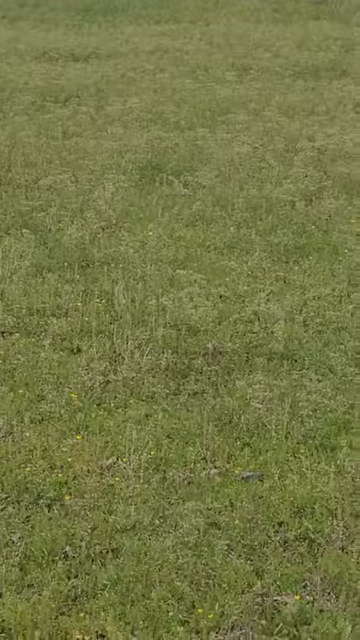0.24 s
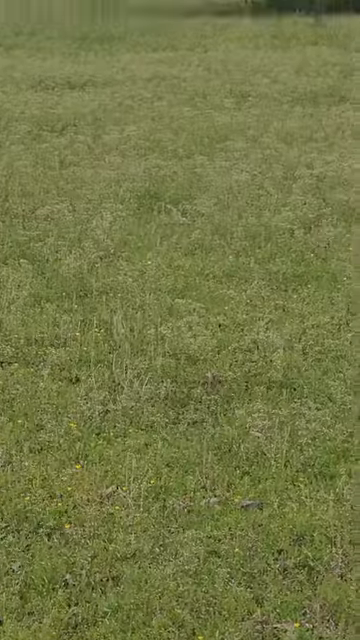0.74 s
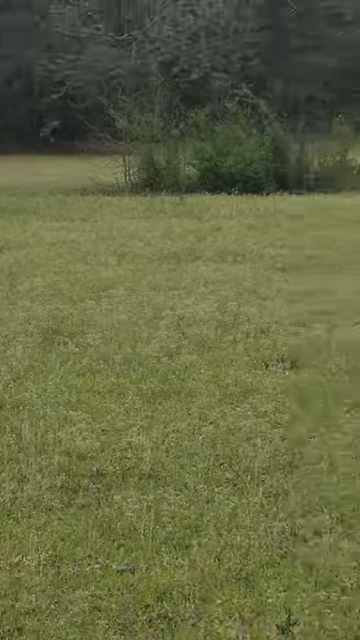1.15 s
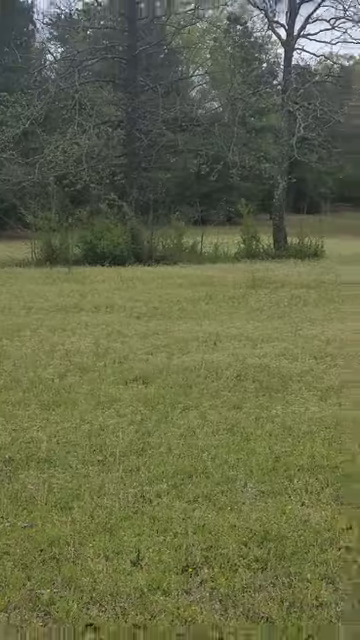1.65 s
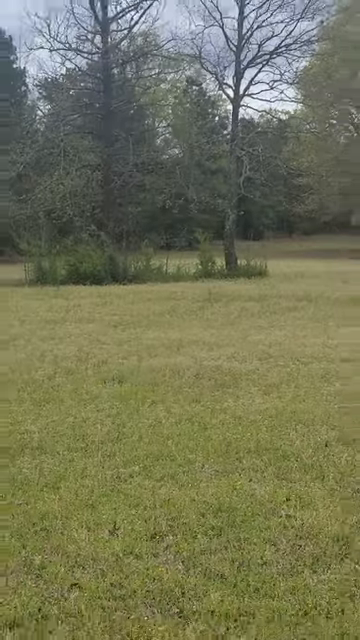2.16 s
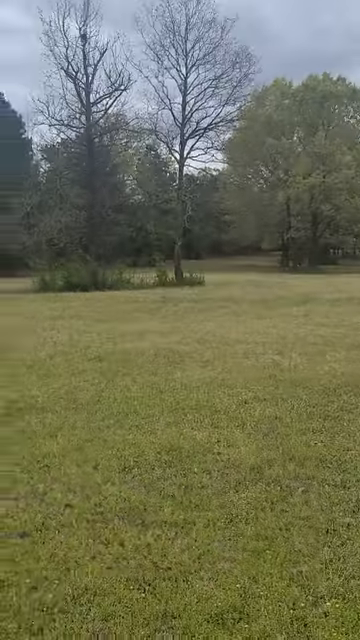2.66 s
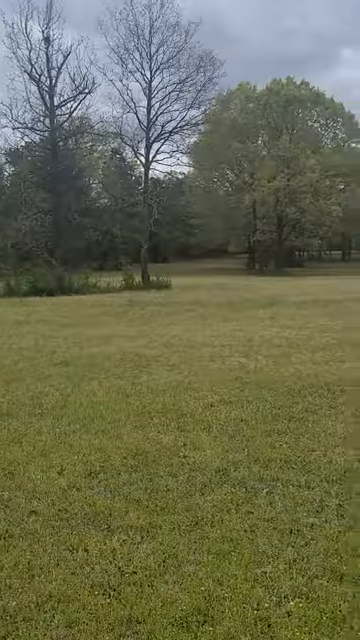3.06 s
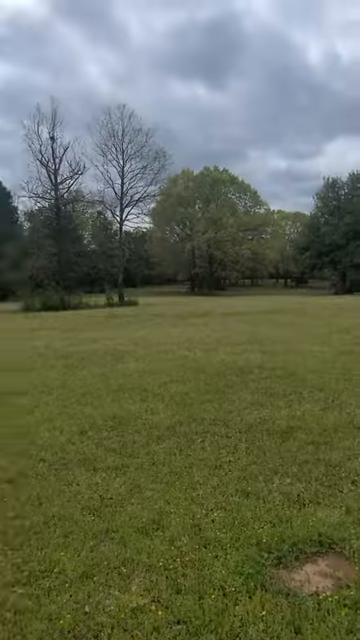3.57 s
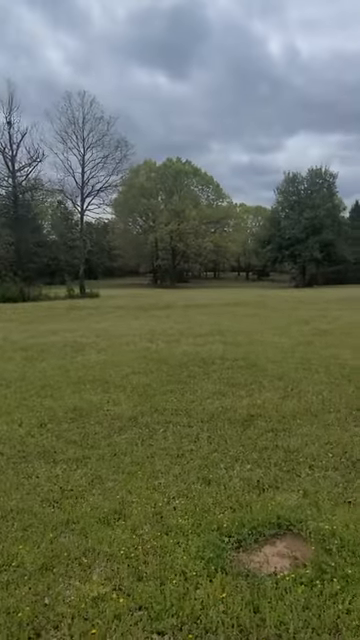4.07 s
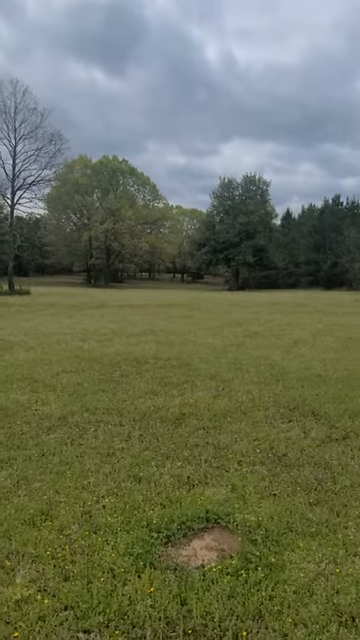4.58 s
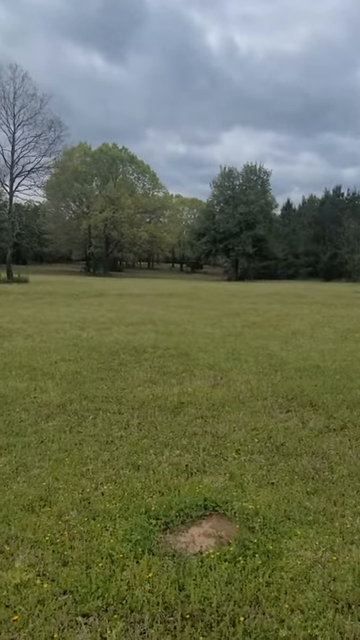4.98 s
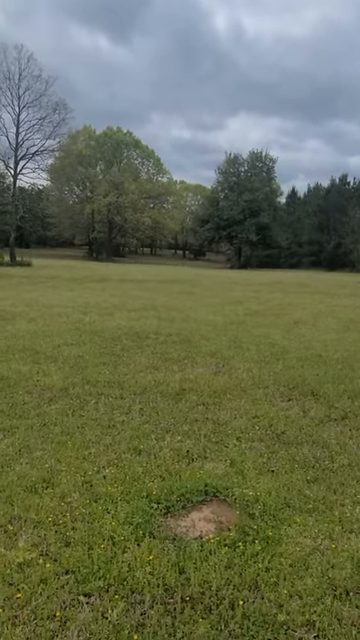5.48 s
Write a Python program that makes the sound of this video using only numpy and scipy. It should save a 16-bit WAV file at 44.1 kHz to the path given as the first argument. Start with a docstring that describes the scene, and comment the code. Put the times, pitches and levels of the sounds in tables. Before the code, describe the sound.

Outdoors in an open grassy field, a hand-held phone is buffeted by low wind, strongest at the start and again near the middle. A crow caws once early while a thin, high katydid buzz fades and then stops. Faint birds whistle far off. In the second half a bird gives quick dry rattles and short clucks, echoed softly by trees, over faint grass hiss.

```python
"""Gusts buffet the two ports of a hand-held phone in an open field: low noise shaped by passing eddies.
A katydid's wing-stroke tones fade and stop; a crow caws once, as harmonics weighted by its throat.
A bird rattles and clucks in gliding notes with octaves; far birds whistle and call high and thin over
faint tonal grains. Small-insect ticks and other short ticks are decaying noise; a finger slides once.
Filtered noise makes a far drone, rustling trees and the hiss of grass."""
import sys
import numpy as np
from scipy import signal
from scipy.fft import rfft, irfft, next_fast_len
from scipy.io import wavfile
from scipy.ndimage import uniform_filter1d, map_coordinates

SR = 44100
rng = np.random.default_rng(int(sys.argv[2]) if len(sys.argv) > 2 else 0)


def transcribe(u):
    """Save the signal u as a 16-bit wav file named by the first command-line argument.

    u: samples, shape (n,) or (channels, n), limited to [-1, 1]; the rate is SR.
    q: integer samples, one column per channel.
    """
    v = np.clip(np.atleast_2d(u).T, -1, 1)
    q = np.round(v * 32767).astype(np.int16)
    wavfile.write(sys.argv[1], SR, q)


N = 252680

# Spectrum of the far drone: frequency_hz, relative_db (per Hz)
DRONE_SPECTRUM = [(30, -21), (70, -8.5), (125, 2.5), (165, -4), (230, -16), (330, -31.5), (600, -59)]
# Spectrum of wind in the trees: frequency_hz, relative_db (per Hz)
TREE_SPECTRUM = [(150, -44), (300, -1.5), (450, -7), (650, -4), (850, -9.5), (1150, -11), (1400, -19),
                 (2000, -58)]
# Likeness of the trees at the two ports: frequency_hz, correlation (no unit)
TREE_LIKENESS = [(300, 0.57), (1200, 0.23)]
# Course of drone and trees, before their random swells: time_s, drone_db, trees_db
FAR_LEVELS = [(.5, -47.5, -64), (1.2, -49.5, -66.5), (2, -50, -70), (3, -52.5, -74), (4.4, -52.5, -73.5),
              (5.2, -52.5, -74.5), (5.73, -58.5, -74.5)]
# Spectrum of grass and far insects: frequency_hz, relative_db (per Hz)
HISS_SPECTRUM = [(600, -38), (1300, 1), (1800, 0), (2400, 3), (3000, 1.5), (3700, 2), (5100, -3.5),
                 (5400, -0.5), (5800, -4), (7300, -9), (8400, -21), (9400, -9), (10600, -31), (12200, -8),
                 (15800, -27.5)]
# Course of the hiss, before its left-right offset: time_s, level_db
HISS_LEVELS = [(.3, -70), (.9, -72), (1.5, -73.5), (2.2, -77.5), (3.2, -81), (4.3, -77.5), (4.8, -80.5),
               (5.4, -78), (5.73, -78)]

# Whistles of far birds, before flutter: start_s, length_s, start_hz, end_hz, level_db
WHISTLES = [(0.55, 0.06, 2487, 2390, -71), (.6, .02, 2220, 2080, -70), (.63, .016, 2420, 2420, -71),
            (.662, .022, 2260, 2190, -72), (0.797, 0.034, 2440, 2374, -66), (.797, .05, 2800, 2850, -71),
            (.84, 0.02, 2200, 2204, -64), (0.905, 0.014, 2230, 2270, -62.5), (1.635, .035, 2620, 2740, -68),
            (1.705, .03, 2720, 2660, -68), (1.98, 0.029, 2360, 2510, -72),
            (3.453, 0.055, 2530, 2440, -76.5), (1.755, 0.082, 2258, 2186, -62),
            (2.023, 0.045, 2780, 2830, -69), (2.065, .06, 2860, 2900, -74), (2.106, 0.081, 2170, 2084, -67),
            (4.174, 0.034, 2450, 2470, -69.5), (4.38, 0.03, 2450, 2460, -71), (5.49, .02, 4450, 4750, -76),
            (5.535, .05, 3300, 3600, -78), (5.583, .03, 3750, 4900, -78), (5.65, .042, 3300, 3700, -78),
            (5.69, .03, 3900, 5100, -78)]
# Notes of a high hoarse bird, before roughening: start_s, length_s, start_hz, end_hz, level_db
SEEP_NOTES = [(2.15, .05, 8600, 7750, -87), (2.195, .095, 7180, 7280, -74), (2.27, .16, 7250, 7350, -83),
              (2.19, .18, 7900, 7600, -86)]

# Short ticks before their colour, the first five a small insect's, the others perhaps the grip's:
# start_s, level_db, centre_hz, sharpness_q (no unit), t60_s
SHORT_TICKS = [(.067, -52, 6500, 1, .006), (.084, -51, 7800, 2, .005), (.102, -47, 7500, .8, .005),
               (.121, -48, 6000, .8, .008), (.139, -48, 8000, .6, .005), (.281, -55, 7800, 2, .006),
               (0.3238, -45, 3500, .8, 0.0024), (.3338, -30, 4500, .7, 0.002),
               (1.7985, -48, 6800, 1.8, 0.009), (1.9021, -51, 4050, 3, 0.0065),
               (2.8582, -40, 3200, 1.2, 0.002), (2.859, -54, 1200, 3, .03), (2.88, -57, 4500, .6, 0.008),
               (2.881, -53, 1200, 3, .03), (2.886, -62, 6300, 1, .02), (4.1404, -57, 9000, .8, .003)]
# Colour of the short ticks: frequency_hz, gain_db
TICK_COLOUR = [(300, 11.5), (7500, 0), (10000, -11), (15000, -10.5)]
# Course of a sliding finger: time_s, level_db
SLIDE_LEVELS = [(1.61, -100), (1.625, -69), (1.665, -67), (1.685, -80), (1.71, -100)]
# Spectrum of the slide: frequency_hz, relative_db (per Hz)
SLIDE_SPECTRUM = [(700, -30), (1300, -12), (2500, -10), (3100, -17), (5000, -46), (8000, -100)]

# Course of the small insect's run of clicks, before click scatter and colour: time_s, level_db
TICKER_LEVELS = [(4.7, -100), (4.75, -91), (4.85, -73), (4.97, -66), (5.1, -66.5), (5.17, -69), (5.25, -66),
                 (5.28, -97)]
# Colour of its clicks: frequency_hz, gain_db
TICKER_COLOUR = [(5000, -30), (7200, 0), (8200, -7), (9300, 0), (11000, -3), (12000, -30)]

# Rattle notes, before scatter, glide and syrinx: start_s, pitch_hz, level_db, octave_db
RATTLE_NOTES = [(3.589, 1170.0, -70, -80), (3.613, 1190.0, -68, -79), (3.643, 1200.0, -63, -76),
                (3.669, 1230.0, -63, -75), (3.697, 1240.0, -64, -75), (3.723, 1180.0, -61, -73),
                (3.756, 1290.0, -58, -66), (3.784, 1260.0, -59, -69), (3.811, 1200.0, -59, -70),
                (3.839, 1230.0, -61, -72), (3.869, 1190.0, -58, -67), (3.895, 1190.0, -64, -74),
                (3.927, 1190.0, -58, -69), (3.954, 1190.0, -60, -70), (3.989, 1160.0, -62, -63),
                (4.022, 1180.0, -55, -61), (4.41, 1270.0, -46, -54), (4.464, 1250.0, -50, -59),
                (4.514, 1220.0, -52, -53), (4.537, 1290.0, -55, -56), (4.564, 1260.0, -54, -54),
                (4.59, 1270.0, -53, -54), (4.618, 1250.0, -53, -54), (4.643, 1260.0, -56, -55),
                (4.67, 1230.0, -54, -55), (4.698, 1260.0, -57, -56), (4.725, 1240.0, -52, -56),
                (4.753, 1230.0, -55, -55), (4.784, 1160.0, -63, -56), (5.042, 1260.0, -57, -57),
                (5.072, 1220.0, -55, -54), (5.093, 1220.0, -62, -60), (5.124, 1190.0, -55, -53),
                (5.15, 1270.0, -57, -57), (5.178, 1200.0, -60, -57), (5.209, 1170.0, -70, -60)]
# Clucks, before pitch waver and syrinx: start_s, length_s, top_share (of the length),
# start_hz, top_hz, end_hz, level_db, octave_db
CLUCK_NOTES = [(4.914, 0.041, .25, 1016, 1050, 880, -53.5, -59.5),
               (4.945, .024, 0.41, 897, 1198, 1020, -50.5, -53), (5.207, .018, .5, 880, 930, 880, -78, -68),
               (5.363, 0.0398, .6, 1027, 1190, 896, -53, -54)]
# Resonances of the rattling bird's syrinx: frequency_hz, gain_db
SYRINX = [(800, -20), (1200, -1), (1600, 6.5), (2200, 5), (2480, 0), (2750, 10), (3000, -10), (3400, -32)]
# Tilt of its voice before the trees answer: frequency_hz, gain_db
ANSWER_TILT = [(1200, 2.4), (2400, 6.5)]
# Answers of two tree lines, before flutter: delay_s, level_db
TREE_LINE_SLAPS = [(.05, -25), (.108, -27)]
NOTE_SCATTER_DB, NOTE_SCATTER = 1.2, .015  # spread of level (dB) and of pitch (share of the pitch)

# Course of the caw: time_s, pitch_hz (before jitter), effort_db, beak_opening (factor on throat resonances)
CAW_COURSE = [(.243, 335, -70, .95), (.255, 350, -52, 0.93), (.282, 364, -45.5, 0.99),
              (.34, 356.6, -46.5, 1.066), (.426, 329.4, -47.5, 0.98), (.472, 319, -49.5, 1.03),
              (.487, 309.5, -51, 1.07), (.502, 284.4, -54, 1.03), (.52, 272, -62, 1.03),
              (.54, 266, -85, 1.2)]
# Resonance of the crow's throat: frequency_hz, gain_db
THROAT = [(1150, -40), (1290, -24), (1450, -13), (1620, -1), (1800, 0), (1980, -8), (2150, -10),
          (2220, -16), (2330, -24), (2450, -30), (2700, -50)]
RASP_HZ, RASP_SPAN_HZ = 315, 90  # roughness starts below this pitch and would be full this far below

# Course of the katydid, before the wing resonance: time_s, level_db, left_right_db
KATYDID_COURSE = [(0, -61.5, -12), (.5, -65.5, -14), (1.0, -70, -20), (2.0, -71.5, -17.5),
                  (2.7, -77.5, -21.5), (3.1, -80, -16), (3.58, -81, -14.5)]
# One wing stroke, before scatter: cycle_share (no unit), level_db, pitch_hz
WING_STROKE = [(.23, -30, 9380), (.28, -4, 9420), (.4, -1, 9610), (.53, 0, 9700), (.62, 0, 9670),
               (.69, -1, 9460), (.73, -30, 9300)]
# Resonance of the wing: frequency_hz, gain_db
WING_RESONANCE = [(8400, -14), (9000, 1), (9250, 3.5), (9450, -0.5), (9800, -0.5), (10000, -10),
                  (10600, -22)]
STROKE_SCATTER_HZ = 22  # spread of pitch from stroke to stroke
SLIP_HZ, SLIP_OVER = 140, 1.5  # a stroke whose timing draw passes this many sigma falls flat by SLIP_HZ

# Spectrum of the buffeting: frequency_hz, relative_db (per Hz)
BUFFET_SPECTRUM = [(12, -18.5), (25, -4.5), (42, -0.5), (65, -3), (100, -12), (160, -23.5), (250, -41.5),
                   (420, -57.5), (900, -92), (2000, -120)]
# Steady buffeting, before sharing between the ports: time_s, level_db, left_right_db
BREEZE = [(0, -47, 0), (.8, -52, -1), (1.3, -52.5, 3.5), (2.1, -52, 0.5), (2.6, -46, 10), (3.3, -56, 8),
          (3.8, -62.5, -1), (4.4, -54, 4), (5.1, -56, 0), (5.73, -59.5, 2)]
# Eddies that break on the ports, before sharing: centre_s, half_width_s, level_db, left_right_db
GUSTS = [(0.121, 0.051, -31, -16.5), (0.213, 0.041, -23, -15.5), (.31, 0.061, -24.5, -23),
         (.4, 0.027, -33, -11), (0.537, 0.028, -34, -13), (.64, 0.029, -34.5, -22), (.94, 0.045, -45, 0),
         (1.08, 0.026, -43.5, 4), (1.26, 0.037, -46.5, 19), (1.538, 0.046, -31, 7.5),
         (1.68, 0.038, -22, -8.5), (1.769, .045, -25.5, 5), (1.86, 0.027, -36.5, 8), (2.31, 0.036, -44, 12),
         (2.47, 0.028, -39.5, 17), (2.711, 0.044, -39, 14), (2.81, 0.024, -36.5, 4.5),
         (2.99, 0.042, -43.5, 11), (3.55, 0.026, -47, 4), (4.1, 0.017, -42.5, 4), (4.28, 0.025, -46, 9),
         (4.85, 0.024, -42, 10), (4.96, 0.012, -34.5, 10)]
# Puffs on a port, before their envelope: start_s, level_db, left_right_db, starting_hz (then falling)
PUFFS = [(0.268, -27, -19, 239), (0.332, -29, -21, 257), (1.657, -42, -16, 246), (4.592, -43, -5, 330),
         (4.604, -38, -5, 380), (4.616, -40, -5, 480), (4.951, -39, 21, 242)]

TOP_HZ = 15838  # band limit of the phone


def amp(db):
    """Decibels are logarithmic: 20 dB is a tenfold amplitude."""
    return 10 ** (np.asarray(db) / 20)


def unit(x):
    """Root-mean-square normalization: scales x to rms 1."""
    return x / np.sqrt(np.mean(x ** 2) + 1e-20)


def along(points, hz):
    """Interpolation over log frequency of (Hz, value) points."""
    f, v = np.transpose(points)
    return np.interp(np.log(hz + 1), np.log(f + 1), v)


def curves(rows):
    """Linear interpolation in time: one value per sample for each column after the time."""
    s, *cols = np.transpose(rows)
    return [np.interp(np.arange(N) / SR, s, c) for c in cols]


def wobble(rate):
    """Band-limited fluctuation: a smooth random curve with rate knots a second."""
    knots = rng.standard_normal(int(N * rate / SR) + 4)
    return map_coordinates(knots, [np.arange(N) * rate / SR])


def filtered(x, response):
    """Linear filtering: the spectrum of x times a response of frequency."""
    m = next_fast_len(N + SR // 2)
    return irfft(rfft(x, m) * response(np.fft.rfftfreq(m, 1 / SR)), m)[..., :N]


def rush(spectrum, alike, patchy_db):
    """Turbulent noise: partly coherent stereo noise of rms 1, patchy in time and frequency."""
    z = signal.stft(rng.standard_normal((2, N + 512)), nperseg=512)[2]
    field = uniform_filter1d(rng.standard_normal(z.shape[1:]), size=5, axis=0)
    field = uniform_filter1d(field, size=10, axis=1)
    pair = signal.istft(z * amp(patchy_db * unit(field)), nperseg=512)[1][:, :N]

    def mid_side(hz):
        # mixing two independent noises at this angle gives the wanted correlation
        turn = np.arccos(np.clip(along(alike, hz), -1, 1)) / 2
        return amp(along(spectrum, hz)) * [np.cos(turn), np.sin(turn)]

    mid, side = filtered(pair, mid_side)
    return unit(np.array([mid + side, mid - side]))


def placed(x, pan_db, count):
    """Interaural cues: a left-right level difference, and the left port count samples late."""
    return np.array([np.roll(x, count) * amp(pan_db / 2), x * amp(-pan_db / 2)])


def echoes(x, t60, db):
    """Diffuse scattering by the tree line: a decaying noise tail, different at each port."""
    t = np.arange(SR // 2) / SR
    tail = rng.standard_normal((2, len(t))) * amp(-60 * t / t60) * (1 - np.exp(-t / 0.0016))
    tail = tail / np.linalg.norm(tail[0])
    return amp(db) * signal.fftconvolve(x[None], tail, axes=1)[:, :N]


def add(track, s, sound):
    """Superposition: mixes a sound in at s seconds."""
    part = track[..., round(s * SR):][..., :sound.shape[-1]]
    part += sound[..., :part.shape[-1]]


def note(length, pitch_hz, db, octave_db, edge, lean=1):
    """A gliding tone with its second harmonic; edge under 1 flattens the top, lean under 1 hastens the attack."""
    u = np.linspace(0, 1, round(length * SR))
    pitch = np.interp(u, np.linspace(0, 1, len(pitch_hz)), pitch_hz)
    phase = 2 * np.pi * np.cumsum(pitch) / SR
    envelope = np.abs(np.sin(np.pi * u ** lean)) ** edge
    return envelope * (amp(db) * np.sin(phase) + amp(octave_db) * np.sin(2 * phase))


def distance():
    """Spatial coherence: a far drone nearly alike at both ports, less alike trees, diffuse hiss of grass."""
    drone_db, trees_db = curves(FAR_LEVELS)
    drone = amp(drone_db + 1.1 * wobble(2.67)) * rush(DRONE_SPECTRUM, [(100, 0.88)], patchy_db=2.5)
    drone = drone * amp([[-.7], [.7]])
    trees = amp(trees_db + 0.31 * wobble(5.27)) * rush(TREE_SPECTRUM, TREE_LIKENESS, patchy_db=2.0)
    hiss_db = curves(HISS_LEVELS)[0] + np.array([[-1.6], [1.6]])
    hiss = amp(hiss_db) * rush(HISS_SPECTRUM, [(2000, .08)], patchy_db=1.6)
    return drone + trees + hiss


def tonal_grains():
    """Random superposition: a faint random texture of 40 short tonal grains, about 2 to 3 kHz."""
    out = np.zeros(N)
    for when, pitch, glide, size in rng.random((40, 4)):
        hz = 2050 + 900 * pitch
        pitches = [hz, hz * (1 + .1 * (glide - .5))]
        add(out, when * N / SR, note(.03, pitches, -79 + 8 * size, octave_db=-120, edge=.8))
    return amp(-7) * (placed(out, -4, count=-5) + echoes(out, t60=.3, db=-2))


def whistles():
    """Amplitude modulation: nearly pure gliding tones of far birds flutter on their way."""
    far = np.zeros(N)
    for s, length, *pitch_hz, db in WHISTLES:
        add(far, s, note(length, pitch_hz, db, octave_db=-120, edge=.45))
    return far * amp(2 * wobble(70))  # moving air makes them flutter


def seeps():
    """Random modulation broadens a thin high tone into a hoarse call, blurred by the trees."""
    out = np.zeros(N)
    for s, length, *pitch_hz, db in SEEP_NOTES:
        add(out, s, note(length, pitch_hz, db, octave_db=-120, edge=.5))
    out = out * (.8 + .8 * wobble(260))
    return placed(out, -8, count=-5) + echoes(out, t60=.4, db=-1)


def short_ticks_and_slide():
    """Resonance and friction: short ticks are decaying noise through a resonator; a finger's slide is noise."""
    out, t = np.zeros((2, N)), np.arange(SR // 30) / SR
    for s, db, hz, q, t60 in SHORT_TICKS:
        decay = amp(-60 * t / t60) + 0.09 * amp(-60 * t / 0.05)  # the faint second part has its own t60
        burst = rng.standard_normal((2, len(t))) * decay
        b, a = signal.iirpeak(min(hz, SR / 3), q, SR)
        add(out, s, amp(db) * signal.lfilter(b, a, burst))
    out = filtered(out, lambda hz: amp(along(TICK_COLOUR, hz)))
    slide = rush(SLIDE_SPECTRUM, [(1000, 0.58)], patchy_db=-2.5)
    return out + amp(curves(SLIDE_LEVELS)[0]) * slide


def ticker():
    """Impulse excitation: a small insect's uneven clicks, about fifty a second, each ring one noise body."""
    gaps_s = 0.02 * (1 + 0.17 * rng.standard_normal(N // 500))
    at = (SR * np.cumsum(gaps_s)).astype(int)
    at = at[at < N]
    sizes = amp(rng.normal(0, 4.0, len(at)))
    clicks = np.bincount(at, sizes, minlength=N) * amp(curves(TICKER_LEVELS)[0])
    t = np.arange(SR // 200) / SR
    body = amp(-60 * t / 0.0049) * rng.standard_normal(len(t))
    ticks = filtered(np.convolve(clicks, body)[:N], lambda hz: amp(along(TICKER_COLOUR, hz)))
    return placed(ticks, -16.0, count=-5) + echoes(ticks, t60=0.14, db=5.5)


def rattle():
    """Frequency modulation: short rising notes in quick runs, roughened by random gain."""
    out = np.zeros(N)
    scatter = rng.standard_normal((len(RATTLE_NOTES), 4))
    for (s, hz, db, octave_db), (size, tune, gape, slope) in zip(RATTLE_NOTES, scatter):
        rise = np.array([-0.53, -0.075, 0.04, 0.68])  # steepens toward the end
        bend = 1 + 0.25 * (1 + 0.19 * slope) * rise
        pitches = hz * (1 + NOTE_SCATTER * tune) * bend
        db, octave_db = db + NOTE_SCATTER_DB * size, octave_db + NOTE_SCATTER_DB * gape
        add(out, s, note(.011, pitches, db, octave_db, edge=.7, lean=.7))
    return out * amp(1 + 2.5 * wobble(500))  # the throat rasps


def clucks():
    """Frequency modulation: longer calls whose pitch arches up, drops and wavers."""
    out = np.zeros(N)
    for s, length, top, *pitch_hz, db, octave_db in CLUCK_NOTES:
        arch = np.interp(np.linspace(0, 1, num=16), [0, top, 1], pitch_hz)
        arch = arch * (1 + .012 * rng.standard_normal(size=16))
        add(out, s, note(length, arch, db, octave_db, edge=1.07, lean=1.07))
    return out


def birds():
    """Source, filter and reflection: rattle and clucks pass the syrinx, and trees answer them and the whistles."""
    far = whistles()
    near = filtered(rattle() + clucks(), lambda hz: amp(along(SYRINX, hz)))
    bright = filtered(near, lambda hz: amp(along(ANSWER_TILT, hz)))
    slaps = sum(amp(db) * np.roll(bright, round(s * SR)) for s, db in TREE_LINE_SLAPS)
    answer = (echoes(bright, t60=.7, db=-17) + slaps) * amp(2 * wobble(90))
    rattling_bird = placed(near, -4.5, count=-5) + answer
    return rattling_bird + placed(far, -7, count=-5) + echoes(far, t60=.45, db=-11)


def crow():
    """Source and filter: harmonics three to nine of a gliding pitch, weighted by the throat resonance."""
    pitch_hz, effort_db, beak = curves(CAW_COURSE)
    phase = 2 * np.pi * np.cumsum(pitch_hz * (1 + 0.0028 * wobble(83.0))) / SR
    voice = np.zeros(N)
    for k in range(3, 10):
        harmonic_db = along(THROAT, k * pitch_hz / beak)
        voice += amp(harmonic_db + 1.2 * wobble(59.2)) * np.sin(k * phase)
    rasp = np.clip((RASP_HZ - pitch_hz) / RASP_SPAN_HZ, 0, 1)  # the voice frays as the pitch sags
    voice = voice * (1 + rasp * wobble(400))
    gate = np.clip((.15 - np.abs(np.arange(N) / SR - .39)) / .012, 0, 1)  # open from .24 to .54 s
    voice = amp(effort_db) * voice * gate
    return placed(voice, pan_db=-4.3, count=5) + echoes(voice, t60=.7, db=-11.5)


def katydid():
    """Stridulation: about 63 wing strokes a second, each a short arched tone, excite the wing resonance."""
    t = np.arange(N) / SR
    rate = 63.0377 - .05467 * (t - 3.255) ** 2  # strokes a second
    strokes = .9595 + np.cumsum(rate) / SR
    share, db, hz = np.transpose(WING_STROKE)
    size, start, late, tune = rng.standard_normal((N // 500, 4))[strokes.astype(int)].T
    swing = strokes % 1 + .03 * late  # timing differs from stroke to stroke
    pitch = np.interp(swing, share, hz) + STROKE_SCATTER_HZ * tune - SLIP_HZ * (late > SLIP_OVER)
    tone = np.sin(2 * np.pi * (np.cumsum(pitch) / SR + start))  # each stroke has its own phase
    envelope = amp(np.interp(swing, share, db) + 1.35 * size + 1.4 * wobble(450))
    buzz = uniform_filter1d(envelope, size=24) * tone  # the wing takes a few cycles to start and stop
    level_db, pan_db = curves(KATYDID_COURSE)
    song = unit(buzz) * amp(level_db) * (t < 3.588)  # the song stops dead
    song = filtered(song, lambda hz: amp(along(WING_RESONANCE, hz)))
    return placed(song, pan_db, count=-5) + echoes(song, t60=0.067, db=-5) * amp([[-4], [2.1]])


def ports(db, pan_db):
    """Power sharing: a level divided between the two ports by its left-right difference."""
    share = amp([pan_db, -pan_db])
    return 4 * amp(2 * db) * share / share.sum(axis=0)


def wind():
    """Turbulent pressure: the powers of breeze and passing gusts add at each port; short puffs thump on top."""
    power, now = ports(*curves(BREEZE)), np.arange(N) / SR
    for s, half, db, pan_db in GUSTS:
        swell = np.exp(-2 * ((now - s) / half) ** 2)
        power = power + ports(db, pan_db)[:, None] * swell
    lumps = amp(2.87 * np.array([wobble(16), wobble(18)]))
    noise = rush(BUFFET_SPECTRUM, [(30, 0.68), (100, 0.61)], patchy_db=0.5)
    out = np.sqrt(power) * unit(lumps * noise)
    t = np.arange(SR // 20) / SR
    envelope = amp(-60 * t / 0.02) * (1 - np.exp(-t / 0.0025))
    for s, db, side_db, hz in PUFFS:
        push = np.sin(2 * np.pi * hz * t * np.exp(-t / 0.027)) * envelope
        add(out, s, placed(amp(db) * push, side_db, count=0))
    return out


def scene():
    """Superposition: the pressures of all sources add at the two ports."""
    field = wind() + distance() + tonal_grains()
    animals = katydid() + ticker() + crow() + birds() + seeps()
    return field + animals + short_ticks_and_slide()


def record(dry):
    """Band limitation: the phone keeps nothing from its top frequency upward."""
    return filtered(dry, lambda hz: hz < TOP_HZ)


dry = scene()
out = record(dry)
transcribe(out)
```